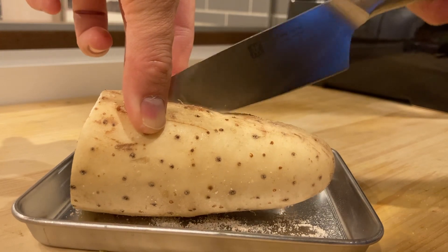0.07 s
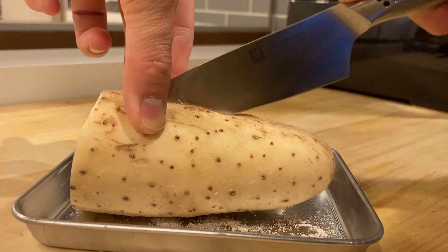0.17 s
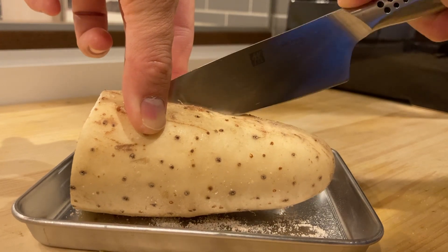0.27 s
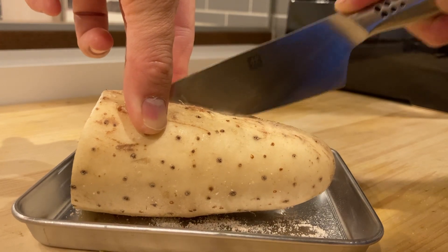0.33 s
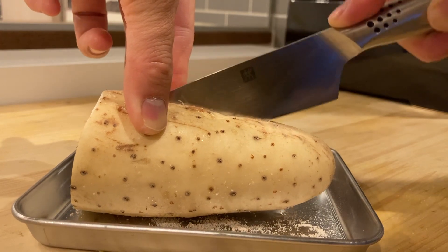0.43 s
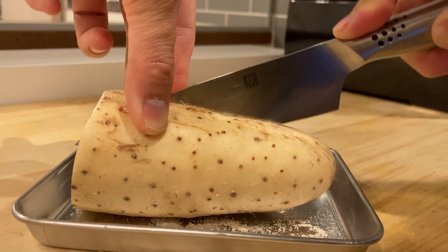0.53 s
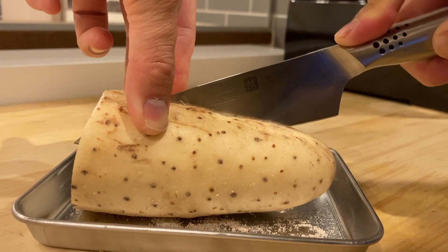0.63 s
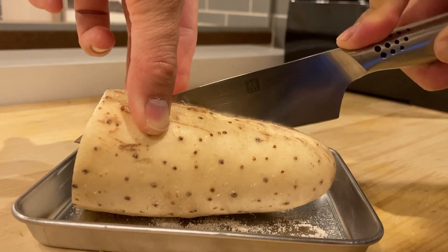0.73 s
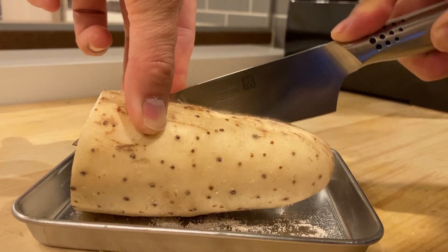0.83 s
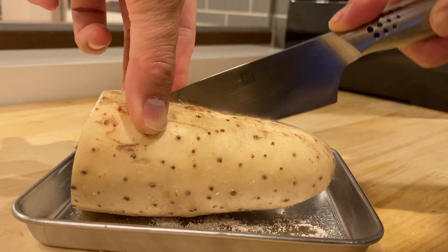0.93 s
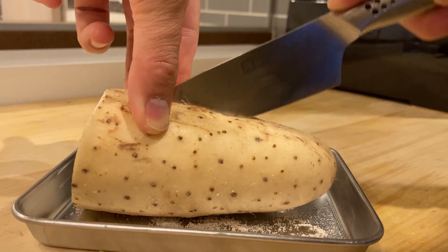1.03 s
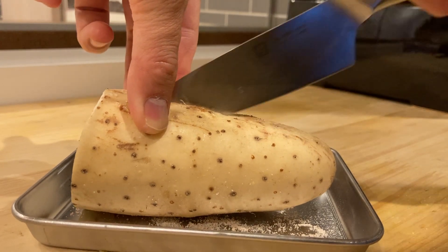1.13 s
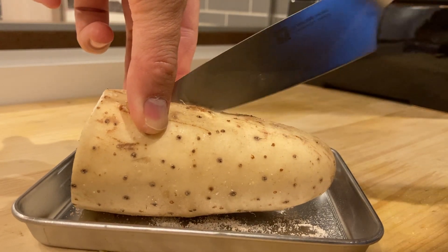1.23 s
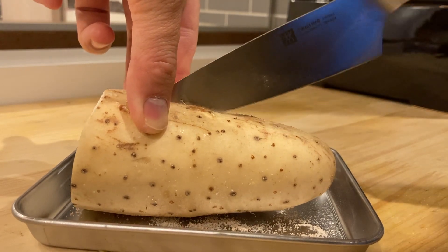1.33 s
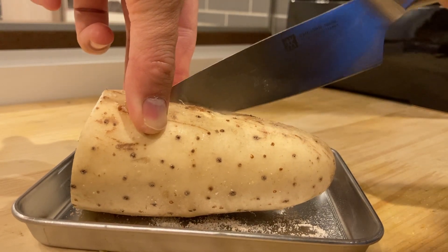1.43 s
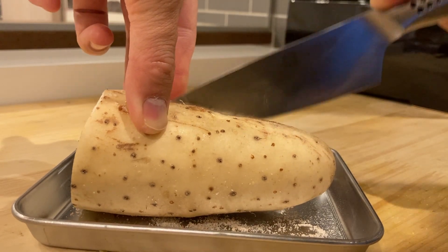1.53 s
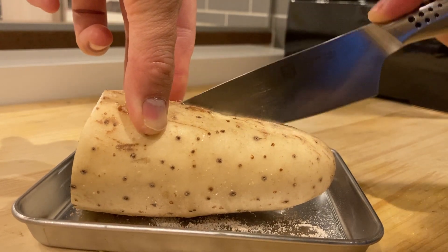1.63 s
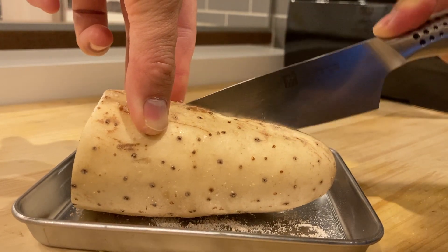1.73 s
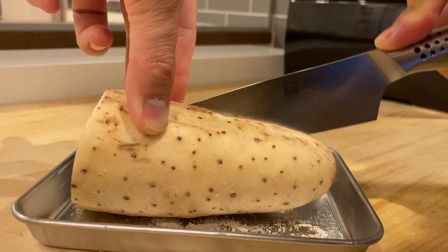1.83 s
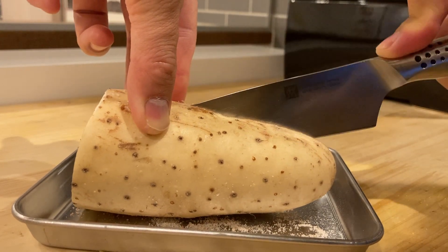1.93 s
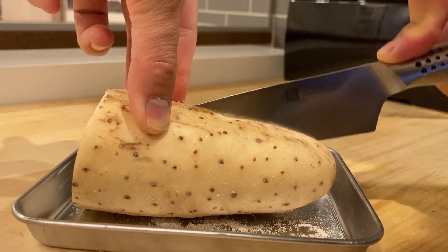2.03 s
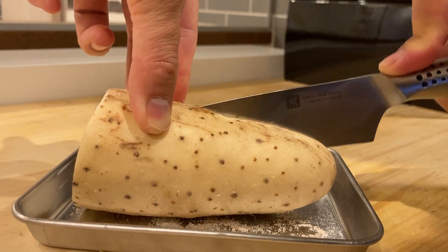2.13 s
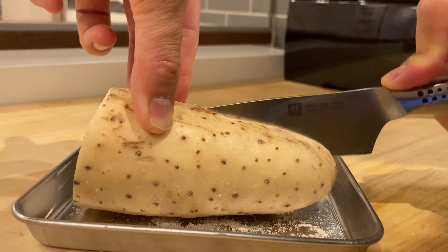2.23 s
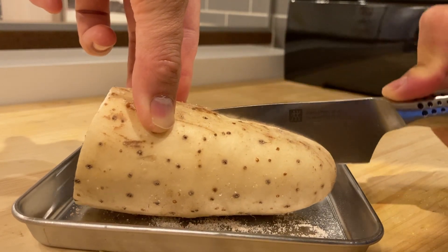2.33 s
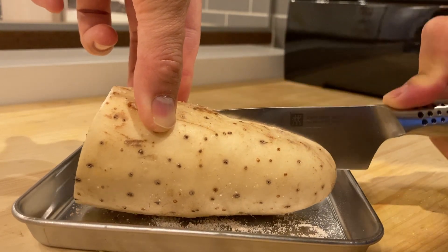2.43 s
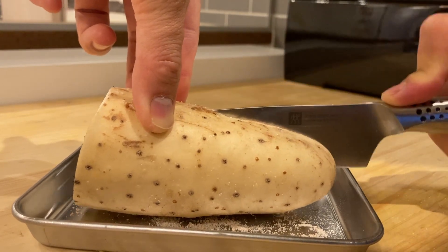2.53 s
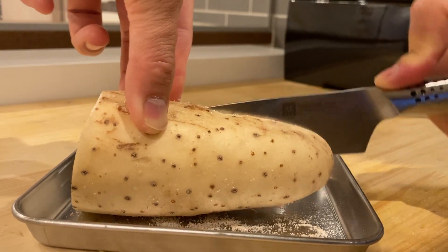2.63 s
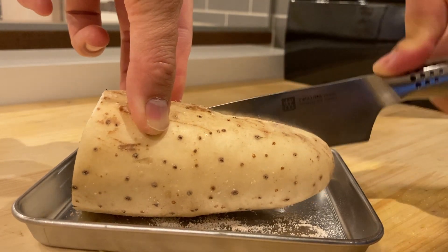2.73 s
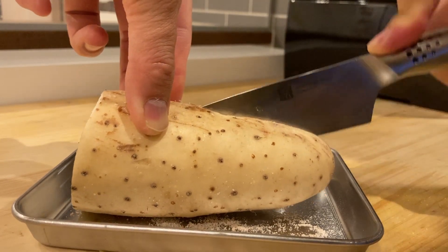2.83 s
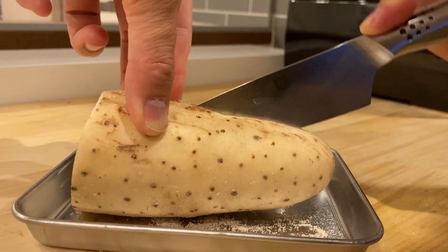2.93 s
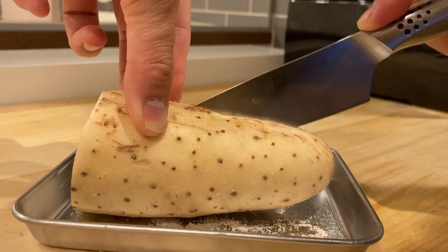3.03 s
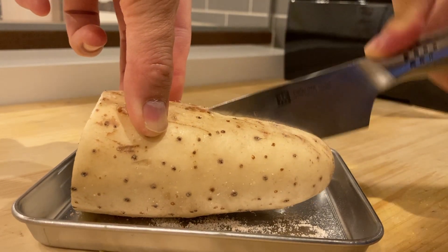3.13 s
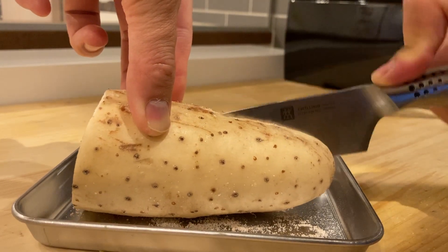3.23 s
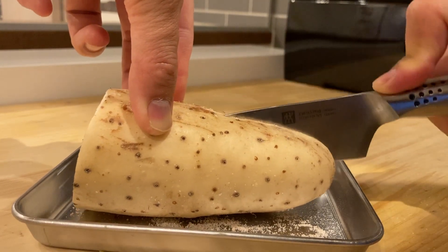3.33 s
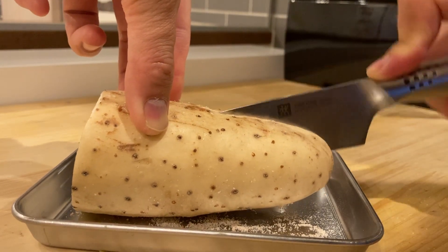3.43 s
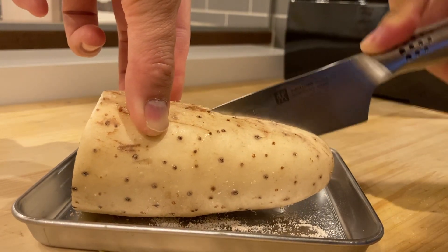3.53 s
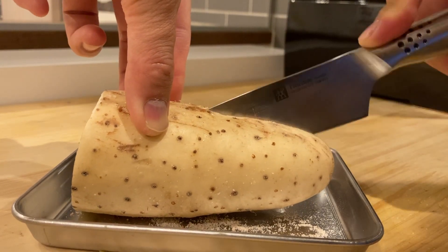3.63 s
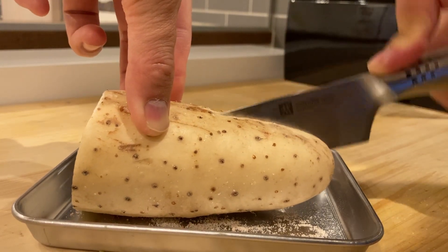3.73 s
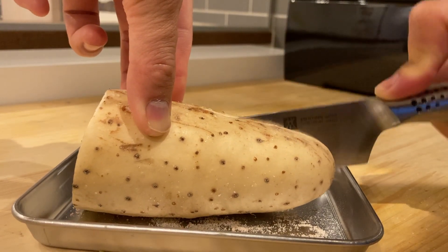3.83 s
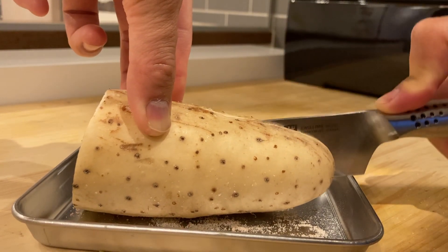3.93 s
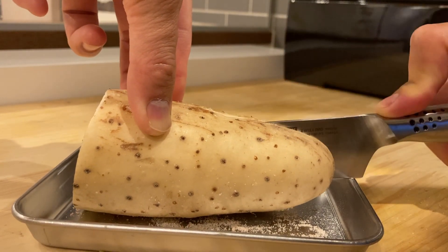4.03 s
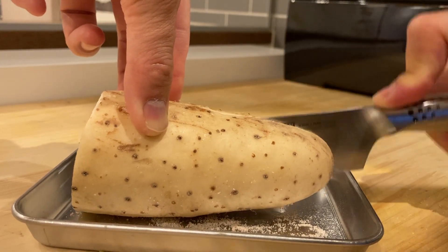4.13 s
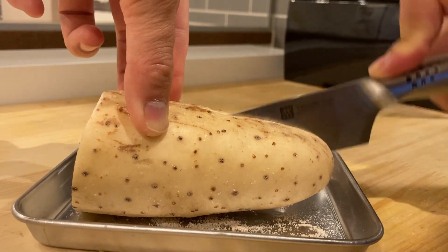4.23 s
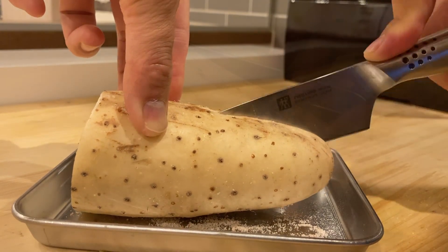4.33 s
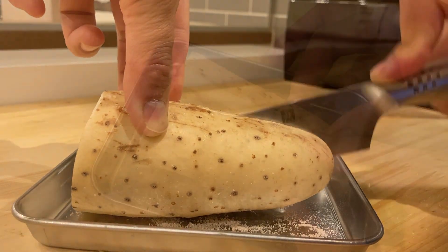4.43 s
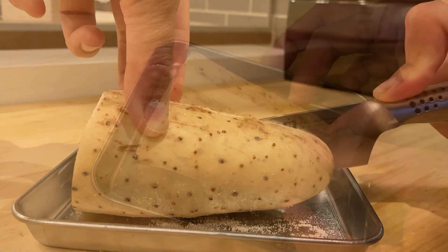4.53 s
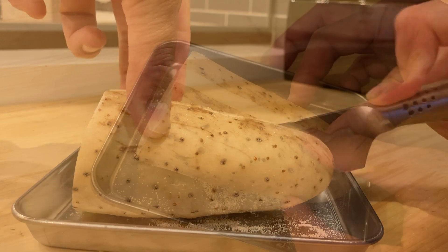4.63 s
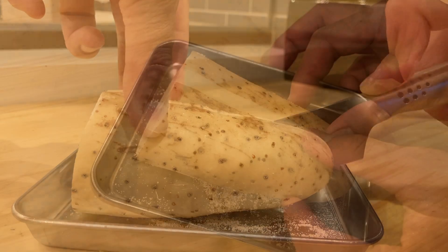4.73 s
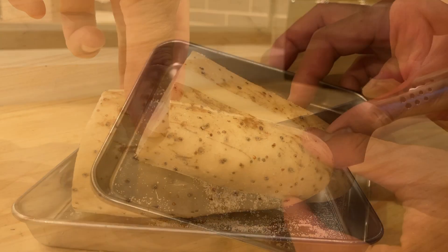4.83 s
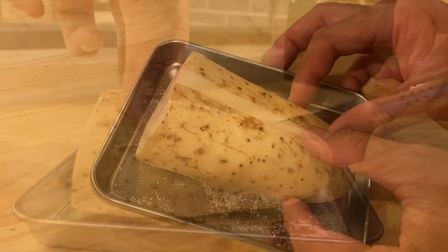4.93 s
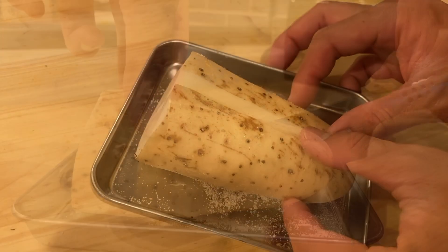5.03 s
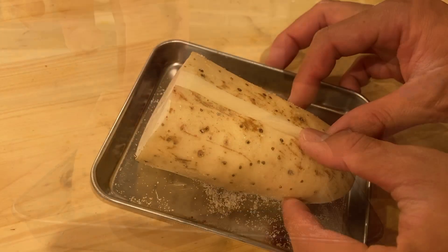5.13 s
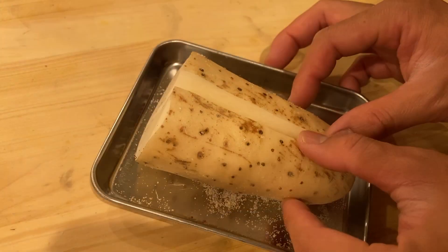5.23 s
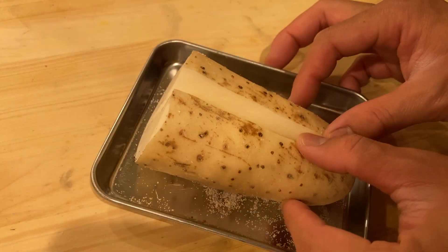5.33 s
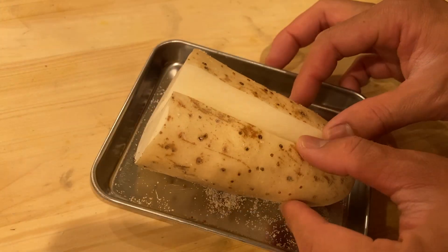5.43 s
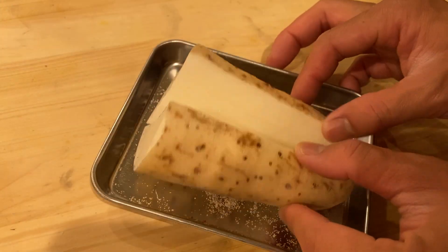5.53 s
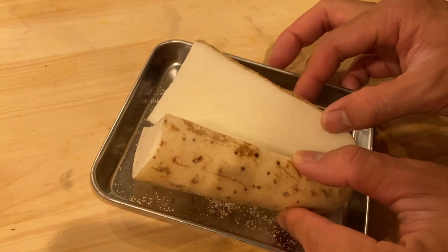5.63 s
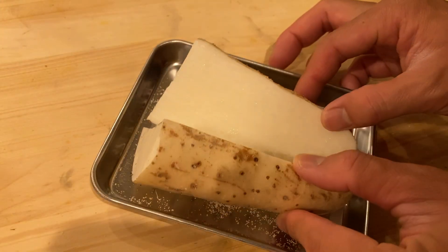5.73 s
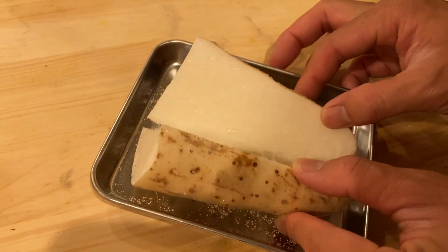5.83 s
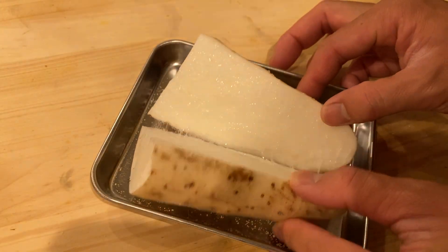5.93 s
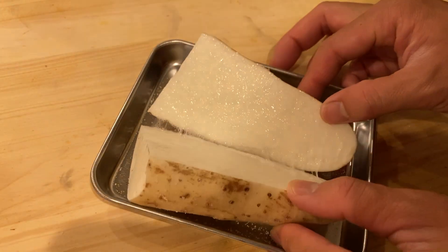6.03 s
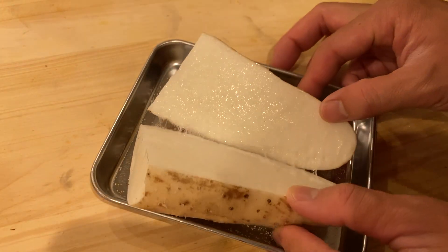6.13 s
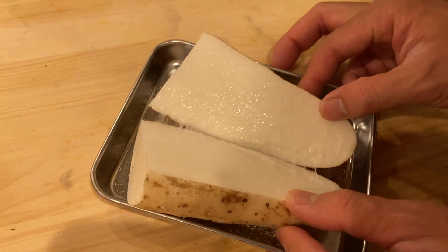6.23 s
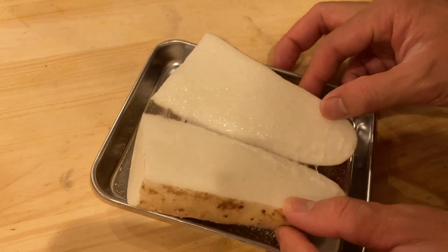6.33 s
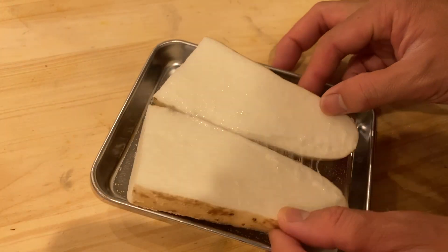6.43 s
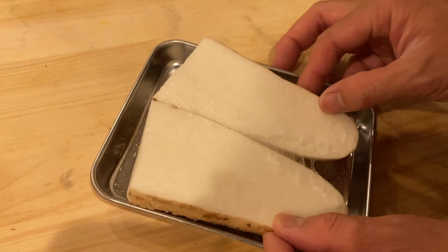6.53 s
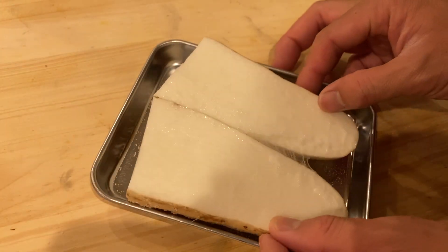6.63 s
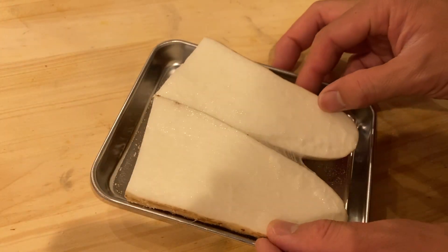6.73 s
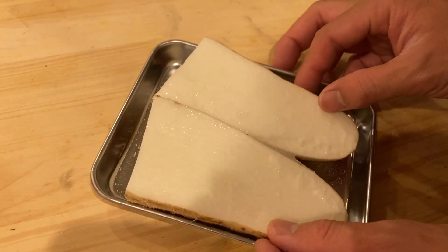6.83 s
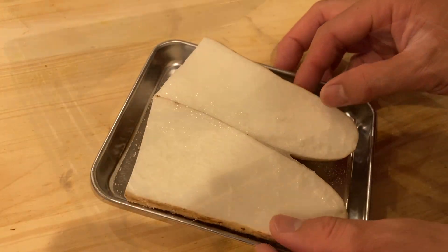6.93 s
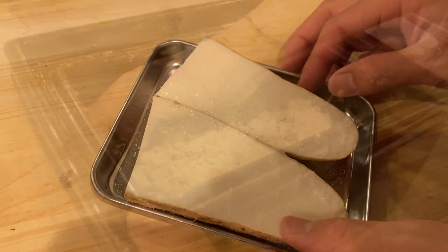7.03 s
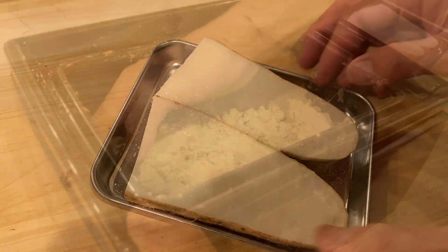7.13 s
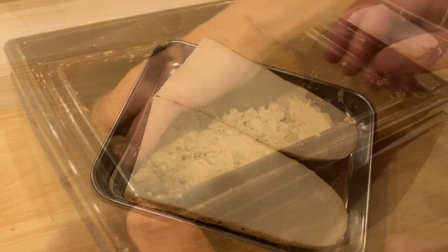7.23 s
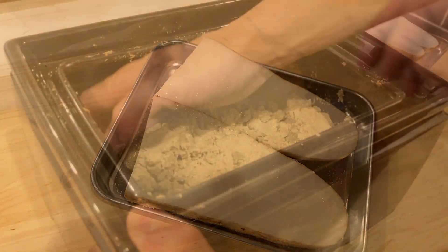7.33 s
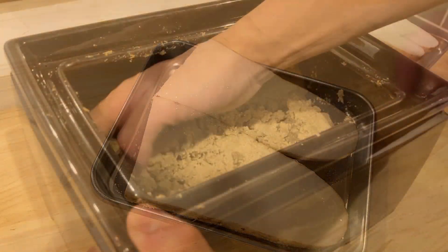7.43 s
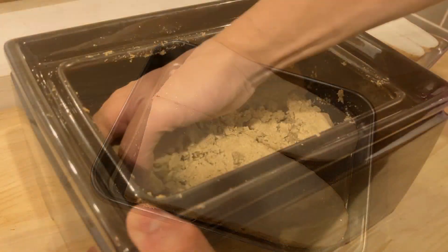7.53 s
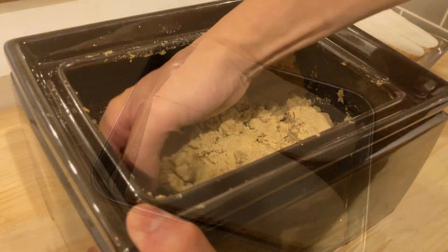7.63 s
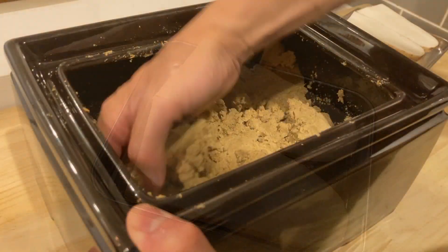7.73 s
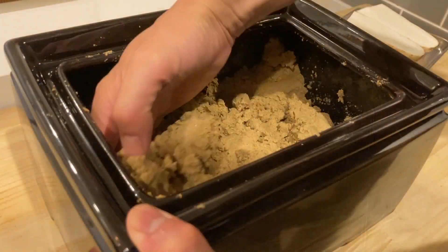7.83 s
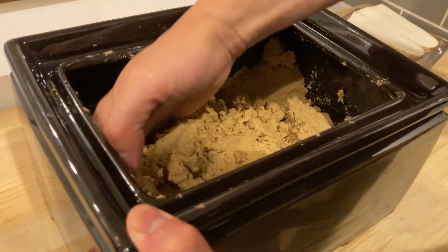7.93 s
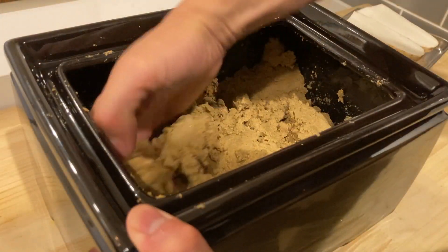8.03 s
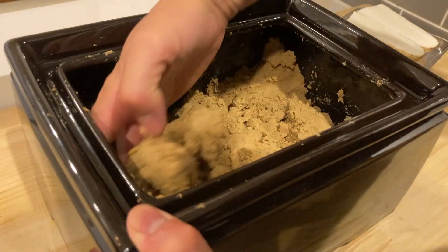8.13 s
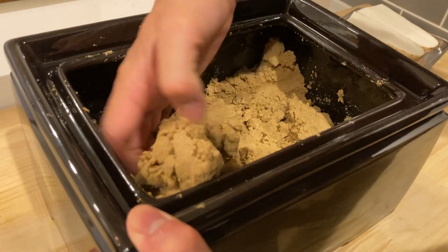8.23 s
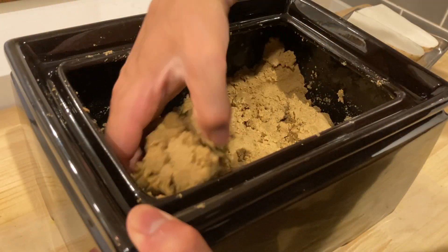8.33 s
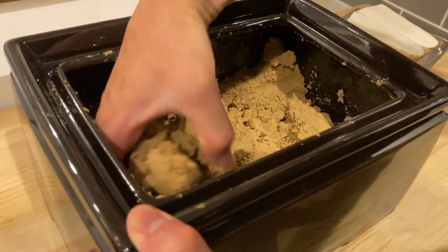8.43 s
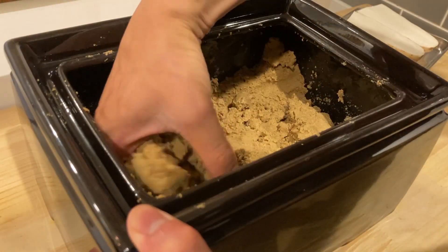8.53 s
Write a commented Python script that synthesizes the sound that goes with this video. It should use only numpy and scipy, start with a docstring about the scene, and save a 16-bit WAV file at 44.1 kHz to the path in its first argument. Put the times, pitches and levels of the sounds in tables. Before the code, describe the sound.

A knife saws through a raw, crunchy root with crisp crackling strokes, then sticky halves tear apart and a hand rustles dully in damp bran.

```python
"""A blade saws with crisp, crackling strokes; sticky tearing and ticks follow, then a dull rustle, over quiet air.
A knife cuts a raw root on a steel tray, hands part the halves, and a hand digs into a tub of damp bran.
Bursting cells gate hiss and shake resonances; bumps are low tones with rumble; bran is clumped noise.
Two spaced microphone ports differ in level and phase; short noise tails make the kitchen."""
import sys
import numpy as np
from scipy import signal
from scipy.fft import rfft, irfft, next_fast_len
from scipy.io import wavfile

SR = 44100
rng = np.random.default_rng(int(sys.argv[2]) if len(sys.argv) > 2 else 0)


def master_out(mix):
    """Clip the mix to full scale and print it as 16-bit PCM to the path in sys.argv[1]."""
    frames = np.transpose(np.atleast_2d(mix))
    ceiling = np.clip(frames, -1, 1)
    pcm = np.round(ceiling * 32767).astype(np.int16)
    wavfile.write(sys.argv[1], SR, pcm)


N = 377923
TIME_S = np.arange(N) / SR
FFT_LENGTH = next_fast_len(N)
FFT_HZ = np.maximum(np.fft.rfftfreq(FFT_LENGTH, 1 / SR), 1)

# Room air spectrum. Each row: frequency in Hz, relative level in dB.
AIR_COLOUR = [(20, -20), (69, -2.5), (549, -17.5), (1490, -36.5), (7910, -37.5), (8570, -49),
              (12500, -43.5)]
# Likeness of the air at the two ports. Each row: frequency in Hz, correlation.
AIR_LIKENESS = [(60, 0.88), (280, 0.83), (590, 0), (1300, 0), (12000, 0.48)]
# Level difference of the ports, scaled per source. Each row: frequency in Hz, left over right in dB.
LEFT_OVER_RIGHT = [(300, 0.5), (700, 3), (1500, 5), (4000, 4.5), (7000, 0.)]
# Phase difference of the ports. Each row: frequency in Hz, lead of the left port in radians.
LEFT_LEAD_RAD = [(860, -0.3), (1290, 0.6), (2670, 2.4), (3700, 0.2), (4570, 0), (4820, -3.1), (5940, -3.2),
                 (6370, -6), (7670, -6.6), (8350, -9.2), (9650, -9.5), (10600, -12.5)]
# Soft bumps through the worktop. Each row: start in seconds, level in dB, frequency in Hz.
WORKTOP_BUMPS = [(4.603, -48.5, 97), (4.873, -63, 125), (5.524, -52.5, 100), (6.155, -48, 101),
                 (6.442, -48.5, 69.4), (6.558, -54.5, 104.6), (8.308, -56.5, 83), (8.36, -65, 92)]

# Hand in the bran. Each row: time in seconds, rustle in dB, dull rubbing in dB.
BRAN_DIGGING = [(6.93, -108, -72.5), (7.07, -74.5, -70), (7.28, -59.5, -71), (7.64, -69.5, -66.5),
                (7.76, -69.5, -95), (8.3, -75.5, -97), (8.42, -69, -69.5), (8.57, -72.5, -104)]
# Bran spectrum. Each row: frequency in Hz, relative level in dB.
BRAN_COLOUR = [(500, -19), (1500, -6), (3000, -5.5), (5500, -10.5), (8000, -5.5), (12500, -9)]
# Tub resonances. Each row: frequency in Hz, width in Hz, relative level in dB.
TUB_RESONANCES = [(250, 26, -4.5), (454, 530, -14)]
# A nail on the tub wall. Each row: time in seconds, crack level in dB, ringing in dB above it.
NAIL_TAPS = [(8.39, -57.5, -5.5)]
# Tub wall resonance. Each row: frequency in Hz, width in Hz, relative level in dB.
WALL_RESONANCES = [(1440, 200, 0)]

# Hands pulling the halves. Each row: start in seconds, length in seconds, crisp level at start in dB,
# at end in dB, body ringing in dB above it.
HAND_PULLS = [(5.445, 0.1, -49, -36, -12.5), (5.84, 0.18, -53, -52.5, -6.5), (6.158, 0.014, -41.5, -42, -7),
              (6.32, 0.086, -46.5, -39, -4.5), (6.54, 0.014, -44, -39, -7.5), (6.63, 0.085, -47, -56, -29)]
# Fingers resting on the sticky halves. Each row: time in seconds, crisp level in dB, body ringing in dB.
FINGERS_HOLDING = [(5.296, -64.5, -95), (5.8, -58, -80), (6.3, -97, -83), (6.7, -80, -55),
                   (6.95, -78, -87.5)]
# Sticky faces letting go, halves touching the tray. Each row: time in seconds, relative crack level in dB,
# body ringing in dB above it.
STICKY_TICKS = [(5.3055, -42.5, 2), (5.4252, -43, -4), (5.452, -32.5, -2.5), (5.469, -36.5, -3),
                (5.495, -31.5, -8.5), (5.5173, -20.5, -10), (5.5374, -20.5, -36), (5.5734, -29.5, -46),
                (5.604, -37.5, -35), (5.8168, -32, -40), (6.0476, -42.5, -11), (6.2187, -29.5, -34),
                (6.242, -21, -14), (6.5331, -30, -29), (6.8758, -49, -43)]
# Sticky tearing spectrum. Each row: frequency in Hz, relative level in dB.
STICKY_COLOUR = [(150, -14.5), (1000, -11.5), (2300, -1), (3300, -3), (4600, -0.5), (7200, 2.5), (9000, -5),
                 (10500, -5.5), (12500, -19)]
# Loose halves. Each row: frequency in Hz, width in Hz, relative level in dB.
LOOSE_RESONANCES = [(550, 200, -6), (940, 290, -6.5), (1160, 28, -0.5), (1750, 340, -8)]
# Air in the wet gap between the halves. Each row: frequency in Hz, width in Hz, relative level in dB.
GAP_RESONANCES = [(2450, 650, 11), (1150, 300, -4)]

# Knife strokes and jerks. Each row: start in seconds, length in seconds, crisp level at start in dB,
# at end in dB, body ringing in dB above it.
KNIFE_STROKES = [(0.305, 0.14, -31, -37, -11.5), (0.495, 0.067, -44, -39.5, -9),
                 (0.638, 0.07, -36, -66.5, -5.5), (0.88, 0.081, -66, -55, -13),
                 (1.685, 0.22, -49.5, -42.5, -4), (2.042, 0.2, -42, -40, -3.5),
                 (2.24, 0.19, -50.5, -47, -3), (2.67, 0.25, -42, -59.5, -7),
                 (3.095, 0.15, -45, -41.5, -3.5), (3.712, 0.17, -48, -38, -4.5),
                 (3.92, 0.1, -41.5, -55.5, 0.5), (4.538, 0.056, -41.5, -37, -7),
                 (4.592, 0.074, -30, -37, -10.5)]
# Blade leaning in the cut between strokes. Each row: time in seconds, crisp level in dB, body ringing in dB.
BLADE_LEANING = [(0.0, -51.5, -59.5), (0.3, -50, -73), (0.72, -69.5, -78.5), (1.12, -66, -75),
                 (1.48, -85.5, -104.5), (1.556, -51, -61), (2.502, -57.5, -69.5), (3.049, -56.5, -70.5),
                 (3.35, -58, -67.5), (3.7, -60.5, -73), (4.399, -57, -70), (4.899, -80, -100)]
# Fibres snapping under the blade. Each row: time in seconds, relative crack level in dB,
# body ringing in dB above it.
FIBRE_SNAPS = [(0.062, -23.5, -15.5), (0.3049, -21, -17), (0.4994, -28, -18), (0.5318, -24, -17),
               (0.606, -35, -22), (0.6285, -27, -6.5), (0.671, -28.5, -35), (0.7956, -45.5, -45),
               (1.0187, -39, -6.5), (1.579, -29.5, -12.5), (1.595, -29, -7), (1.648, -31.5, -6),
               (1.663, -34, -9), (1.716, -26.5, -12), (1.782, -23, -9), (1.808, -26, -4.5),
               (1.84, -34.5, -1.5), (1.873, -34.5, -19), (1.9903, -35, -11), (2.023, -30.5, -20),
               (2.0365, -28.5, -1.5), (2.146, -32.5, -12), (2.185, -34.5, -2), (2.349, -40, 6.5),
               (2.411, -28, -47), (2.465, -27.5, -4), (2.518, -36, -10.5), (2.6908, -33, -1.5),
               (2.8362, -25.5, -11.5), (2.8485, -20.5, -3.5), (2.9114, -27.5, -8), (2.9944, -28, -11.5),
               (3.018, -39, 0.5), (3.1, -22, -13), (3.137, -32, 1.5), (3.192, -26, -8),
               (3.3807, -44.5, 3.5), (3.474, -23, -3.5), (3.5344, -31, -10), (3.713, -28, -8.5),
               (3.782, -28.5, -2.5), (3.804, -36.5, -2), (3.916, -31, 4.5), (3.968, -28.5, -8),
               (4.004, -24, -6), (4.296, -38, -40), (4.408, -37.5, -7), (4.442, -19, -6),
               (4.507, -27.5, -6.5), (4.5343, -27.5, -9.5)]
# Crisp tearing spectrum. Each row: frequency in Hz, relative level in dB.
CRISP_COLOUR = [(230, -5.5), (1000, -7), (3100, -2.5), (4200, 2), (5500, -2), (7000, 9), (9000, 3.5),
                (11200, 1.5), (12500, -8)]
# Root held on the tray. Each row: frequency in Hz, width in Hz, relative level in dB.
HELD_RESONANCES = [(262.4, 41, -6.5), (540, 80, -5), (753, 55.7, 1.5), (1130, 106, -7.5), (1415, 180, -7.5),
                   (1954, 350, -4.5), (2653, 480, -4.5)]
# Steel tray under the edge. Each row: frequency in Hz, width in Hz, relative level in dB.
TRAY_RESONANCES = [(4200, 330, -2), (515, 140, 0.5)]

AIR_DB = -67.5
ROOM_T60_S, ROOM_DB, ROOM_REDRAW_S = 0.081, -6, 0.25
BUMP_RUMBLE_RATIO, BUMP_FILTER_WIDTH_HZ = 0.72, 98
STROKE_RISE_DB_PER_S, STROKE_FALL_DB_PER_S = 2500, 315.5
PULL_RISE_DB_PER_S, PULL_FALL_DB_PER_S = 410, 215
SWELL_DB, SWELL_DB_PER_S = -12, 1208.5  # short swell of hiss leading into each crack
CRACK_RISE_S, CRACK_TICK_T60_S = 0.0004, 0.009
CELL_T60_S, BAND_CELL_T60_S = 0.0045, 0.006
THROUGH_S, LIFT_S, TRAY_DB = 4.53, 4.68, -3.5
STOPBAND_HZ = 13000


def amp(db):
    """Decibels to gain."""
    return 10 ** (np.asarray(db) / 20)


def rms_one(x):
    """Scale to rms 1."""
    return x / np.sqrt(np.mean(x ** 2) + 1e-20)


def levels(rows):
    """Each dB column as a gain over time, silent outside the table."""
    times_s, *columns_db = np.transpose(rows)
    return [amp(np.interp(TIME_S, times_s, db, left=-200, right=-200)) for db in columns_db]


def at_hz(points):
    """Interpolate a table along log frequency."""
    hz, value = np.transpose(points)
    return np.interp(np.log(FFT_HZ), np.log(hz), value)


def shaped(x, gain):
    """Filter by a gain at each frequency."""
    return irfft(rfft(x, FFT_LENGTH) * gain, FFT_LENGTH)[..., :N]


def noise(colour, channels=1):
    """Steady noise with the given spectrum, rms 1."""
    white = rng.standard_normal((channels, N))
    return rms_one(shaped(white, amp(at_hz(colour))))


def decay(clicks, t60_s):
    """Every click becomes a jump that dies away exponentially."""
    step_gain = amp(-60 / (max(t60_s, 0.002) * SR))
    return signal.lfilter([1], [1, -step_gain], clicks + 1e-18)


def resonate(x, modes):
    """Parallel resonances of alternating sign, scaled to about keep the rms of white noise."""
    out, power = 0, 0
    for k, (hz, width_hz, db) in enumerate(modes):
        radius = np.exp(-np.pi * width_hz / SR)
        edge = (1 - radius ** 2) / 2
        poles = [1, -2 * radius * np.cos(2 * np.pi * hz / SR), radius ** 2]
        out = out + (-1) ** k * amp(db) * signal.lfilter([edge, 0, -edge], poles, x)
        power += amp(2 * db) * np.pi * width_hz / SR
    return out / np.sqrt(power)


def crackle(per_s, spread_db, t60_s, smooth):
    """Envelope of random bursts, few large and many small, over steady friction; rms 1."""
    sizes = amp(spread_db * np.minimum(rng.exponential(1, N), 2.3))
    starts = rng.random(N) < per_s / SR
    return rms_one(rms_one(decay(sizes * starts, t60_s)) + smooth)


def cracks(events, t60_s):
    """Envelopes of single cracks, each after a short swell: a crisp one and one that shakes the body."""
    crisp, body = np.zeros((2, N))
    t = np.arange(SR // 8) / SR
    before_s = t[SR // 40::-1]
    swell = amp(SWELL_DB - SWELL_DB_PER_S * before_s)
    tail = amp(-3 - 60 * t / t60_s)
    tick = amp(8 - 60 * t / CRACK_TICK_T60_S)
    shape = (tail + tick) * (1 - np.exp(-t / CRACK_RISE_S))
    for start_s, db, body_db in events:
        i = round(start_s * SR)
        crisp[i:i + len(t)] += amp(db) * shape
        crisp[i - len(swell):i] += amp(db) * swell  # the swell stays out of the body
        body[i:i + len(t)] += amp(db + body_db) * shape
    return crisp, body


def moves(rows, rise_db_per_s, fall_db_per_s, resting):
    """Each move rises, runs from its first level to its last and dies away, over the resting level."""
    crisp, body = levels(resting)
    for start_s, length_s, first_db, last_db, body_db in rows:
        end_s = start_s + length_s
        corners_s = [start_s - 1, start_s, end_s, end_s + 1]
        corners_db = [first_db - rise_db_per_s, first_db, last_db, last_db - fall_db_per_s]
        gain = amp(np.interp(TIME_S, corners_s, corners_db))
        crisp, body = crisp + gain, body + gain * amp(body_db)
    return crisp, body


def flesh(motion, events, colour, rubbed, knocked, per_s, spread_db, smooth, crack_db):
    """Tearing flesh: bursting cells gate a hiss band by band, and with the cracks shake resonances."""
    crisp, body = motion
    crack, knock = cracks(events, 0.048)
    shared = crackle(per_s, spread_db, CELL_T60_S, smooth)
    hiss, out = noise(colour)[0], 0
    edges_hz = np.geomspace(150, 14000, num=8)
    for low_hz, high_hz in zip(edges_hz, edges_hz[1:]):
        # some cells burst within one band only, so the colour changes from grain to grain
        grain = rms_one(shared + 0.4 * crackle(per_s, spread_db, BAND_CELL_T60_S, 0))
        band_filter = signal.butter(2, [low_hz, high_hz], "band", fs=SR, output="sos")
        band = signal.sosfilt(band_filter, hiss)
        out = out + band * (crisp * grain + amp(crack_db) * crack)
    white = rng.standard_normal(N)
    rubbing = resonate(white * body * shared, rubbed)
    knocking = resonate(white * amp(crack_db) * knock, knocked)
    return out + rubbing + knocking


def ports(x, shade):
    """The ports differ in phase mostly in the treble, and in level by the table times shade."""
    half = amp(shade * at_hz(LEFT_OVER_RIGHT) / 2)
    lead_rad = np.interp(FFT_HZ, *np.transpose(LEFT_LEAD_RAD))
    return shaped(x, np.array([half * np.exp(1j * lead_rad), 1 / half]))


def air():
    """Diffuse noise: alike on both ports in the bass, unlike in the middle, partly alike in the treble."""
    alike = np.clip(at_hz(AIR_LIKENESS), -1, 1)
    mid, side = noise(AIR_COLOUR, channels=2)
    mid = shaped(mid, np.sqrt(1 + alike))
    side = shaped(side, np.sqrt(1 - alike))
    return amp(AIR_DB) * rms_one(np.array([mid + side, mid - side]))


def kitchen(x):
    """Random noise tails, different at each port, cross-fading to new ones every quarter second."""
    hop, t = round(ROOM_REDRAW_S * SR), np.arange(SR // 8) / SR
    fade = np.hanning(2 * hop)
    x, out = np.pad(x, hop), np.zeros((2, N + SR))
    for i in range(0, N + hop, hop):
        tail = rng.standard_normal((2, len(t))) * amp(-60 * t / ROOM_T60_S) * (t > 0.002)
        tail /= np.sqrt(np.sum(tail ** 2, axis=1, keepdims=True))
        piece = x[i:i + 2 * hop]
        faded = piece * fade[:len(piece)]
        wet = signal.fftconvolve(faded[None], tail, axes=1)
        out[:, i:i + wet.shape[1]] += wet
    return amp(ROOM_DB) * out[:, hop:hop + N]


def bumps():
    """Each bump swells and fades over a few low cycles of the worktop, with a rumble around them."""
    out, t = np.zeros(N + SR), np.arange(SR // 5) / SR
    swell = t / 0.035 * np.exp(1 - t / 0.032)
    for start_s, db, hz in WORKTOP_BUMPS:
        i = round(start_s * SR)
        mode = [(hz, BUMP_FILTER_WIDTH_HZ, 0)]
        rumble = rms_one(resonate(resonate(rng.standard_normal(len(t)), mode), mode))
        tone = np.sin(2 * np.pi * hz * t)
        out[i:i + len(t)] += amp(db) * swell * (tone + BUMP_RUMBLE_RATIO * rumble)
    return out[:N]


def bran():
    """Damp grains rustle in clumps; the hand rubs the tub dully and a nail taps its wall."""
    rustle, rub = levels(BRAN_DIGGING)
    clumps = crackle(per_s=87, spread_db=0.54, t60_s=0.045, smooth=1.8)
    grains = rustle * clumps * noise(BRAN_COLOUR)[0]
    tap_envelope = cracks(NAIL_TAPS, 0.034)[1]
    tap = resonate(tap_envelope * rng.standard_normal(N), WALL_RESONANCES)
    rub = rub * crackle(per_s=120, spread_db=2.2, t60_s=0.027, smooth=2.2)
    return grains + tap + resonate(rub * rng.standard_normal(N), TUB_RESONANCES)


def parting():
    """Hands pull the sticky halves apart: tearing and ticks ring the halves and the wet gap."""
    motion = moves(HAND_PULLS, PULL_RISE_DB_PER_S, PULL_FALL_DB_PER_S, FINGERS_HOLDING)
    return flesh(motion, STICKY_TICKS, STICKY_COLOUR, rubbed=LOOSE_RESONANCES, knocked=GAP_RESONANCES,
                 per_s=180, spread_db=7.2, smooth=2.7, crack_db=-0.4)


def tray(cut):
    """Once the blade is through, it grates on the tray and rings the steel until it rests."""
    grating = cut * (TIME_S > THROUGH_S) * (TIME_S < LIFT_S)
    return amp(TRAY_DB) * resonate(grating, TRAY_RESONANCES)


def cutting():
    """Knife strokes tear cells and snap fibres, ringing the held root and at last the tray."""
    motion = moves(KNIFE_STROKES, STROKE_RISE_DB_PER_S, STROKE_FALL_DB_PER_S, BLADE_LEANING)
    cut = flesh(motion, FIBRE_SNAPS, CRISP_COLOUR, rubbed=HELD_RESONANCES, knocked=HELD_RESONANCES,
                per_s=150, spread_db=5.6, smooth=0.85, crack_db=-6.5)
    return cut + tray(cut)


def scene():
    """Sources at the two ports, with reflections, bumps and air."""
    dug, parted, cut = bran(), parting(), cutting()
    near = ports(cut, 1) + ports(parted, 0.75) + ports(dug, -0.21)
    reflected = kitchen(cut + parted + 2 * dug)
    return near + reflected + bumps() + air()


def record(dry):
    """A steep low-pass cuts the top, 60 dB down from the stopband edge."""
    low_pass = signal.cheby2(12, 60, STOPBAND_HZ, fs=SR, output="sos")
    return signal.sosfilt(low_pass, dry)


dry = scene()
out = record(dry)
master_out(out)
```